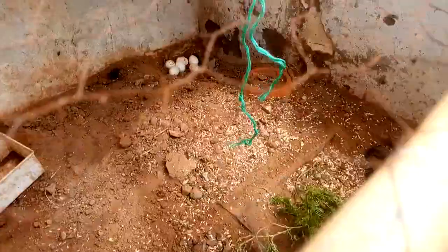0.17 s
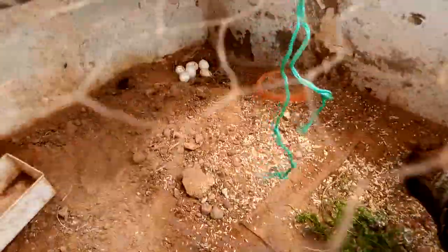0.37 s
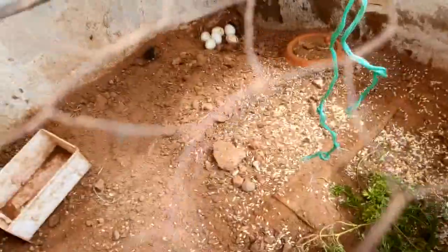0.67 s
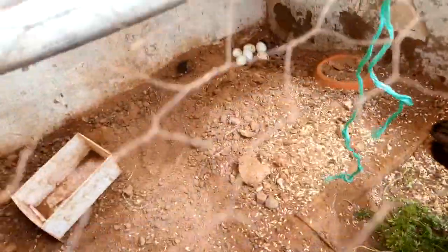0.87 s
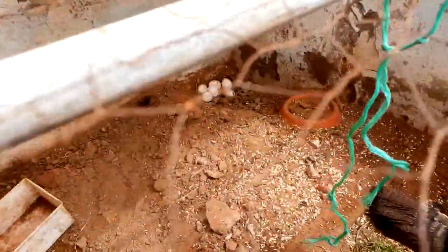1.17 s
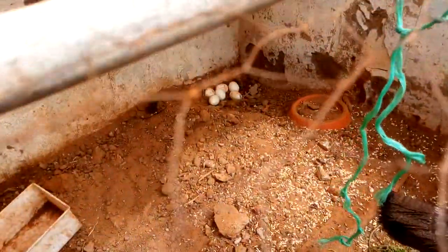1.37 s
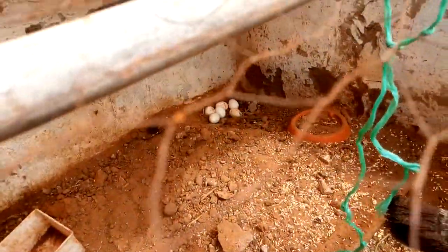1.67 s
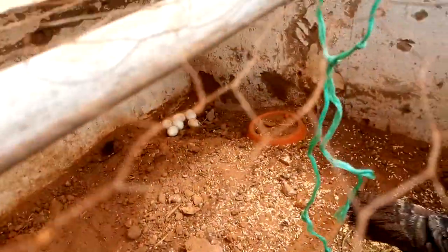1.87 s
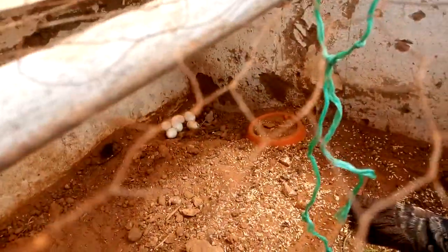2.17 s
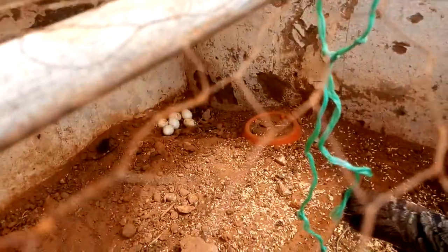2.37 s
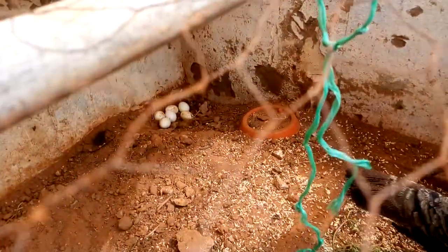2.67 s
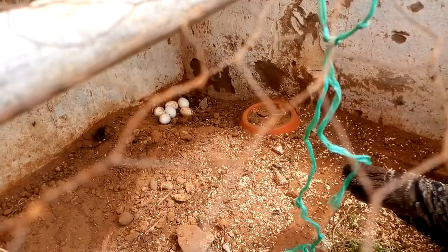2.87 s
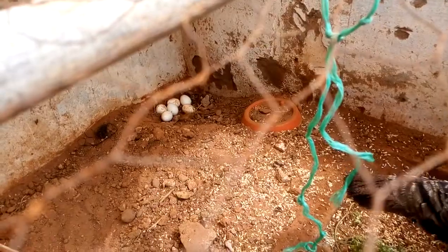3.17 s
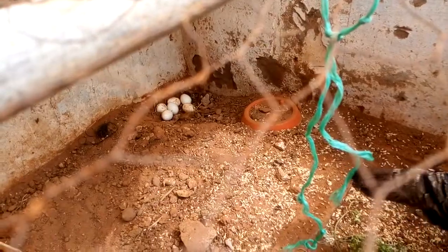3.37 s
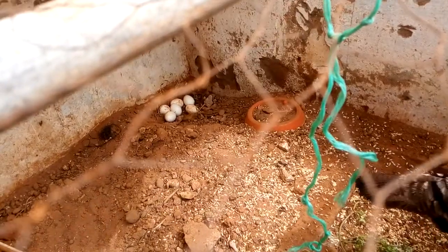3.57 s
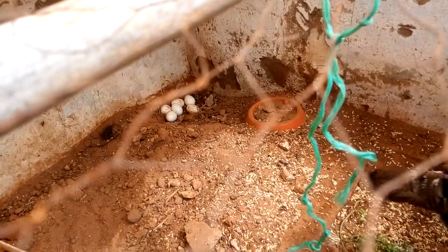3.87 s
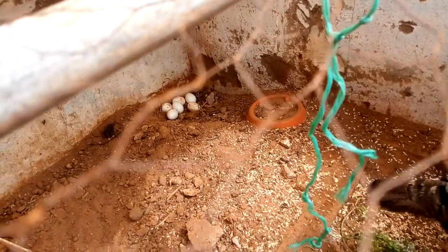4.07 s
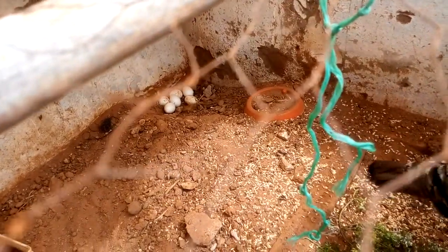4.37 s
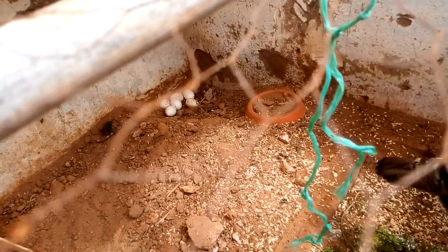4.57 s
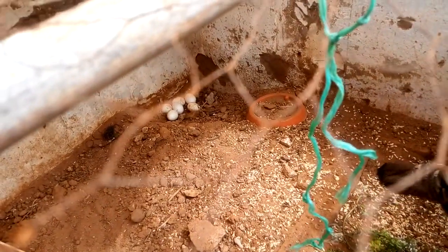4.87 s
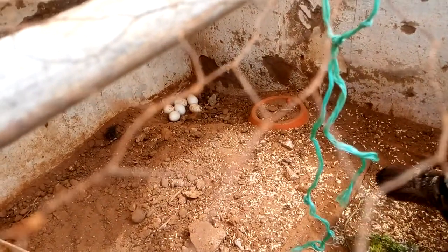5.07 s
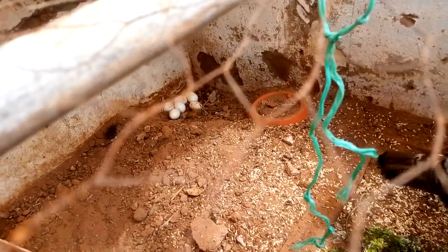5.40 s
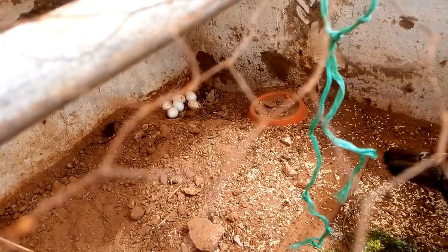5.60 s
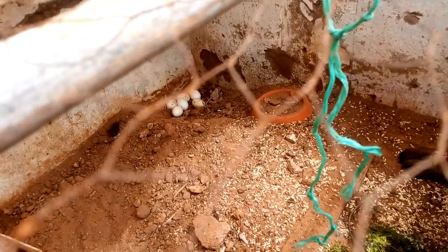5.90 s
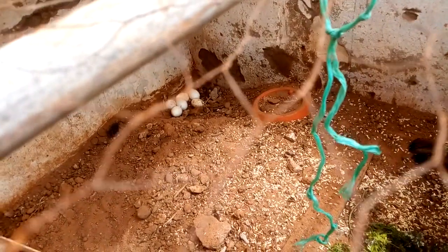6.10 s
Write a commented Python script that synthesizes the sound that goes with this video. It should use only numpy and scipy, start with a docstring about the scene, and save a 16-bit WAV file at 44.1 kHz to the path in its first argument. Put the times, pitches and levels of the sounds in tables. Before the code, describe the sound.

A quiet outdoor pen with hard walls, heard close by on a handheld phone: soft airy hush, slight hiss, a thin far-off bird whistle at the start. From 0.3 to 0.6 s feet crackle and scrape in dry grit, with sharp small ticks. At 0.77 s a turkey hen voices a short clear note, then four quick upward chirps until about 1.05. A soft feathery brush and scrape come at 1.1 to 1.3, then a thudding, crackling scuffle at 1.7 to 1.9. A twig snaps at 2.5; a second, higher, tightly packed call runs 2.7 to 2.9. A third, three chirps, comes at 3.65 to 3.9. Mostly hush follows, with tiny rustles near 4.25. A hollow knock sounds at 5.24, then five chirps from 5.5 to 5.8. Faint wire creaks, rustles and distant whistles close it, past 6 s. Near walls echo the calls briefly.

```python
"""Turkey hen in an earth pen

A turkey hen purrs a metre or two from a hand-held phone: held harmonic tones, then quick rising chirps.
Noise grains make feet scuff dry litter and feathers brush it; short cracks and decaying modes make twigs
and grit tick. The wire fence rings in its modes and creaks in wavering tones, and small birds whistle in
arched tones far off. Near walls throw back the voice and ticks, over a flickering hush of open air."""
import sys
import numpy as np
from scipy import signal
from scipy.fft import rfft, irfft
from scipy.io import wavfile
from scipy.ndimage import uniform_filter1d

SR = 44100
rng = np.random.default_rng(int(sys.argv[2]) if len(sys.argv) > 2 else 0)


def natural_amplitude(level_db):
    """Convert a level in decibels to a linear amplitude factor, elementwise."""
    exponent = np.asarray(level_db, float) / 20
    return 10 ** exponent


def pcm_store(signal):
    """Save signal as 16-bit PCM."""
    levels = np.round(np.clip(np.atleast_2d(signal), -1, 1) * 32767)
    wavfile.write(sys.argv[1], SR, levels.astype(np.int16).T)


N = 275184
T = np.arange(N) / SR


def unit(x):
    """Scale to rms 1."""
    return x / np.sqrt(np.mean(x ** 2))


def colour(x, points):
    """Shape a spectrum by (frequency [Hz], level [dB]) points, joined along log frequency."""
    hz, db = np.transpose(points)
    f = np.fft.rfftfreq(len(x), 1 / SR) + 1
    gain = natural_amplitude(np.interp(np.log(f), np.log(hz), db))
    return irfft(rfft(x) * gain, len(x))


def band(x, lo_hz, hi_hz):
    """Causal band-pass."""
    return signal.sosfilt(signal.butter(2, [lo_hz, hi_hz], "band", fs=SR, output="sos"), x)


def walk(rate):
    """Random levels held 1 / rate seconds and slewed; spread near 1."""
    k = int(SR / rate)
    held = np.repeat(rng.standard_normal(N // k + 1), k)
    return 1.03 * uniform_filter1d(held, k)[:N]


def add(out, s, sound):
    """Mix a sound in at time s."""
    i = int(s * SR)
    out[i:i + len(sound)] += sound[:N - i]


def ring(hz, t60):
    """One mode that decays by 60 dB in t60 seconds."""
    t = T[:int(t60 * SR)]
    return np.sin(2 * np.pi * hz * t) * np.exp(-np.log(1000) * t / t60)


def grit(rate, scatter_db, hiss):
    """Cracks of very uneven size, rate per second, each a brief noise burst, over some hiss."""
    crack_s = .0006  # decay time
    hit = rng.random(N) < rate / SR
    size = np.minimum(rng.exponential(size=N), 2.7)
    noise = rng.standard_normal(N)
    bursts = signal.lfilter([1], [1, -np.exp(-1 / (crack_s * SR))], hit * natural_amplitude(scatter_db * size))
    return unit(bursts * rng.standard_normal(N)) + hiss * noise


def patchy(x, points, patchy_db):
    """Colour a sound in overlapping thirds of an octave, each of which comes and goes on its own."""
    spectrum = rfft(colour(x, points))
    thirds = 3 * np.log2(np.fft.rfftfreq(N, 1 / SR) + 1)
    first, last = np.ceil(3 * np.log2([points[0][0], points[-1][0]]))
    out = 0
    for centre in np.arange(first, last):
        share = np.cos(np.pi / 2 * np.clip(thirds - centre, -1, 1)) ** 2
        out = out + natural_amplitude(patchy_db * walk(50)) * irfft(spectrum * share, N)
    return unit(out)


# the hen's held notes: (start [s], length [s], starting pitch [Hz], middle pitch [Hz], end pitch [Hz],
#                        level at the starting pitch [dB])
HELD_NOTES = [(.766, 0.079, 779, 750, 703, -33.5), (2.676, 0.052, 698, 702, 678, -43),
              (3.659, 0.034, 853, 833, 776, -38), (3.693, 0.02, 828, 857, 881, -40),
              (5.51, 0.042, 780, 776, 828, -40), (5.845, 0.013, 763, 790, 765, -41)]
# overtones of each held note, against its fundamental: (second harmonic [dB], third harmonic [dB])
HELD_OVERTONES = [(-15.5, -22), (-22, -23.5), (-12, -15.5), (-15, -28), (-30.5, -29), (-39, -45)]


def held_notes():
    """A clean tone with two weak harmonics; it swells in, bends in pitch, louder where higher, and stops."""
    attack_s, release_s = 0.013, 0.0038
    db_per_octave = 50  # more effort raises pitch and level together
    out, t = np.zeros(N), T[:SR // 8]
    for (s, length, *pitch_hz, db), (second_db, third_db) in zip(HELD_NOTES, HELD_OVERTONES):
        opening = np.interp(t, [0, attack_s, length, length + release_s], [0, 1, 1, 0])
        gate = np.sin(np.pi / 2 * opening) ** 2
        hz = uniform_filter1d(np.interp(t, [0, length / 2, length], pitch_hz), size=400)
        phase = 2 * np.pi * np.cumsum(hz) / SR
        tone = np.sin(phase) + natural_amplitude(second_db) * np.sin(2 * phase) + natural_amplitude(third_db) * np.sin(3 * phase)
        level = np.sqrt(2) * natural_amplitude(db + db_per_octave * np.log2(hz / pitch_hz[0]))
        add(out, s, gate * level * tone)
    return out


# the hen's chirps, one list per call: (time of the crest [s], crest level before smoothing [dB],
#                        pitch at the crest [Hz], steepest climb [Hz/ms], swell time [ms])
CHIRP_CALLS = [
    [(.848, -29, 880, 31.2, 6.4), (.915, -28.5, 892, 40.7, 5.8), (0.973, -28.5, 890, 51, 1.8),
     (1.029, -26.5, 880, 58.6, 3.1)],
    [(2.73, -32, 917, 12.5, 4.6), (2.784, -33, 654, 2.8, 5.5), (2.792, -24.5, 1007, 54, 2.5),
     (2.843, -31.5, 704, 16, 2.2), (2.85, -24, 1004, 63, 1.9), (2.908, -26.5, 1010, 55, 4)],
    [(3.776, -28.5, 878, 49, 4.2), (3.833, -26.5, 900, 43.7, 4.8), (3.889, -22.5, 900, 54, 3.2)],
    [(5.562, -30.5, 1002, 28.7, 6.8), (5.624, -29, 1063, 57.5, 8.6), (5.684, -27, 1037, 62, 5.3),
     (5.741, -25.5, 1020, 61, 4.2), (5.798, -25, 1000, 53, 3.3)],
]
# her throat in each call: (second harmonic [dB], third harmonic [dB], throat resonance [Hz],
#                        top of the sweep [Hz])
CHIRP_THROATS = [(-15.5, -29, 1785, 1330), (-10, -22, 1915, 1540), (-27, -46, 1750, 1420),
                 (-25, -34.5, 2090, 1470)]


def chirps():
    """Each chirp swells while it climbs, peaks, and runs on more softly towards the top of its sweep."""
    lead_s = .03  # room for the swell before the crest
    low_hz, throat_width_hz, upper_throat_hz = 638, 280, 2310
    crest_s, tail_s, tail_db = 0.00083, .0075, -6
    out, t = np.zeros(N), T[:int(.07 * SR)] - lead_s
    for call, (second_db, third_db, throat_hz, top_hz) in zip(CHIRP_CALLS, CHIRP_THROATS):
        middle, half = (top_hz + low_hz) / 2, (top_hz - low_hz) / 2
        for s, db, hz, climb, swell_ms in call:
            start = np.arctanh(np.clip((hz - middle) / half, -.99, .99))
            pitch = middle + half * np.tanh(start + climb * 1e3 * t / half)
            phase = 2 * np.pi * np.cumsum(pitch) / SR
            rise = np.exp(-np.abs(t * 1e3 / swell_ms) ** 1.26)
            crest = np.exp(-(t / crest_s) ** 2)
            tail = natural_amplitude(tail_db) * np.exp(-(t / tail_s) ** 4) * (1 - crest)
            env = np.where(t < 0, rise, crest + tail)
            env = uniform_filter1d(uniform_filter1d(env, size=60), size=45)
            # harmonics show near the crest, each best while it crosses a throat resonance
            near = np.exp(-(t / 0.0067) ** 2)
            lo_hz, hi_hz = throat_hz - throat_width_hz / 2, throat_hz + throat_width_hz / 2
            second = natural_amplitude(second_db) * band(near * np.sin(2 * phase), lo_hz, hi_hz)
            upper_throat = natural_amplitude(third_db) / (1 + ((3 * pitch - upper_throat_hz) / 250) ** 2)
            third = near * upper_throat * np.sin(3 * phase)
            add(out, s - lead_s, natural_amplitude(db) * (env * np.sin(phase) + second + third))
    return out


def hen():
    """Held notes and chirps, with a rasp of air that trails the voice."""
    rasp_hz, breath_db = (1340, 2550), -26
    voice = held_notes() + chirps()
    effort = uniform_filter1d(np.abs(voice), size=500, origin=200)  # origin delays it
    rasp = unit(band(band(rng.standard_normal(N), *rasp_hz), *rasp_hz))
    return voice + natural_amplitude(breath_db) * effort * rasp


# feet in the litter: (start [s], time to fade by 20 dB [s], crackle [dB], scrape [dB], thud [dB])
SCUFFS = [(0.29, 0.1112, -31, -33.5, -40.5), (0.334, 0.0946, -32.5, -55, -49),
          (0.366, 0.0385, -28, -59, -58), (0.38, 0.0857, -32, -39, -47.5), (0.441, 0.09, -31.5, -45, -48),
          (0.489, 0.027, -32, -31.5, -43.5), (.545, 0.0842, -45, -44.5, -53), (.568, 0.0239, -43, -49, -36),
          (0.6, 0.1271, -48.5, -44.5, -43.5), (1.166, 0.1, -37.5, -34.5, -49),
          (1.195, 0.163, -57, -46.5, -44.5), (1.595, 0.1457, -57, -57, -60), (1.716, 0.107, -40, -45, -46),
          (1.736, 0.0432, -34, -39.5, -36), (1.762, 0.0752, -32, -32.5, -31),
          (1.794, 0.0982, -38, -35.5, -38), (1.834, 0.09, -43.5, -46, -37.5),
          (1.905, 0.0562, -49.5, -49.5, -46.5), (1.975, 0.07, -53.5, -64, -61), (2.27, 0.24, -76, -72, -65),
          (4.255, 0.28, -59, -76, -69), (5.239, 0.12, -59, -58.5, -67.5), (5.861, 0.06, -55.5, -53, -53),
          (5.888, 0.1, -79, -57, -48), (6.082, 0.14, -73, -65.5, -55), (6.19, 0.76, -61, -59.5, -58.5)]
# spectra of crackling grit (also of ticks and far-off stirring), scraping feet and their thud, each:
# (frequency [Hz], relative level per Hz [dB])
CRACKLE_SPECTRUM = [(1500, -12), (2600, -13.5), (3200, -3.5), (4300, -11), (5900, 0.5), (7200, -10.5),
                    (8600, -27), (16200, -29.5)]
SCRAPE_SPECTRUM = [(300, -7.5), (550, -1.5), (1500, -1), (2900, -12)]
THUD_SPECTRUM = [(50, -9.5), (120, -1), (400, -5.5), (800, -15.5)]


def scuffs():
    """Grit crackles, feet scrape and thud; each scuff starts fast and dies away as the litter settles."""
    attack_share = 0.064  # of the fading time
    power = np.zeros((3, N))
    for s, fade, *db in SCUFFS:
        t = T[:int(3 * fade * SR)]
        attack = np.minimum(t / (attack_share * fade), 1) ** 2
        shape = attack * natural_amplitude(-2 * 20 * (t / fade) ** 1.06)
        for layer, layer_db in zip(power, db):
            add(layer, s, natural_amplitude(2 * layer_db) * shape)
    grains = grit(550, 3.6, .45) * natural_amplitude(2.0 * walk(120))
    crackle = patchy(grains, CRACKLE_SPECTRUM, 3.2)
    scrape = patchy(grains + grit(400, 3.9, 0.5), SCRAPE_SPECTRUM, 2.4)
    thud = patchy(grit(250, 1.2, 1.27), THUD_SPECTRUM, 4.7)
    return np.sum(np.sqrt(power) * [crackle, scrape, thud], axis=0)


# twigs and grit that tick: (time [s], crack level before colouring [dB], ring pitch [Hz], ring level [dB])
TICKS = [(0.293, -7, 410, -28), (0.3024, -22, 840, -41), (0.3408, -20.5, 2390, -25.5),
         (0.3597, -23.5, 2980, -29), (0.3805, -15.5, 1520, -24), (0.3903, -19, 403, -29),
         (0.4457, -18.5, 2940, -46), (0.5007, -39, 376, -29), (0.5091, -19.5, 1550, -22.5),
         (0.5467, -32, 2440, -31.5), (0.5672, -35.5, 710, -34.5), (0.5724, -50, 168, -31.5),
         (0.6055, -29, 1680, -29.5), (0.6913, -33.5, 870, -33), (0.7446, -68, 500, -43.5),
         (1.1668, -39.5, 684, -33), (1.1844, -20.5, 466, -26.5), (1.213, -50, 4750, -28),
         (1.611, -19, 1580, -33), (1.739, -24, 300, -35.5), (1.7659, -20.5, 1480, -26.5),
         (1.7758, -30, 400, -34), (1.7822, -22.5, 199, -38), (1.7934, -29, 1560, -24),
         (1.8213, -21.5, 272, -41), (1.8338, -34, 250, -34.5), (1.852, -28, 395, -30.5),
         (1.843, -28.5, 1500, -47),  (2.16, -43.5, 1640, -52.5), (2.4917, -43, 1070, -42),
         (4.2573, -45.5, 5450, -56), (4.6027, -43.5, 500, -76), (6.1613, -41.5, 2300, -54.5)]


def ticks():
    """A noisy crack of a millisecond or two and a short dull ring, longer where lower."""
    cracks, rings = np.zeros(N), np.zeros(N)
    t = T[:int(.01 * SR)]
    for s, db, hz, ring_db in TICKS:
        noise = rng.standard_normal(len(t))
        add(cracks, s, natural_amplitude(db) * noise * np.exp(-t / 0.00097))
        add(rings, s, natural_amplitude(ring_db) * ring(hz, 0.0075 + 5 / hz))
    # contact is not instant, so the rings start rounded
    return colour(cracks, CRACKLE_SPECTRUM) + uniform_filter1d(rings, size=7)


# a hollow knock and its bounce: (time [s], level [dB])
KNOCKS = [(5.242, -24.5), (5.291, -49)]
# modes of the knocked thing: (frequency [Hz], relative level [dB], time to decay by 60 dB [s])
KNOCK_MODES = [(517, -16, 0.06), (598, -12, 0.052), (2003, -15, 0.044), (2196, -11, 0.041),
               (3070, -14, 0.039), (3490, -21, 0.057), (4580, -16, 0.04), (5260, -12.5, 0.038)]


def knocks():
    """A hollow knock rings in its own modes, which build up over the contact and die away."""
    contact_s = 0.0043
    rings = np.zeros(N)
    for s, db in KNOCKS:
        for hz, mode_db, t60 in KNOCK_MODES:
            mode = ring(hz, t60)
            onset = np.minimum(T[:len(mode)] / contact_s, 1) ** 2
            add(rings, s, natural_amplitude(db + mode_db) * mode * onset)
    return uniform_filter1d(rings, size=7)


# a twig that snaps: (time [s], level before colouring [dB])
SNAPS = [(2.4922, -7)]
# its bright, even spectrum: (frequency [Hz], relative level [dB])
SNAP_SPECTRUM = [(1200, -51.5), (2200, 0), (6300, -0.5), (7500, -27), (12000, -48), (16000, -43)]


def snaps():
    """One sharp break, trailed by a millisecond of splintering."""
    out, t = np.zeros(N), T[:int(.01 * SR)]
    for s, db in SNAPS:
        splinters = .1 * rng.standard_normal(len(t)) * np.exp(-t / .001)
        add(out, s, natural_amplitude(db) * ((t == 0) + splinters))
    return colour(out, SNAP_SPECTRUM)


# soft brushes of feathers and chaff, levels before shaping and wavering:
# (start [s], length [s], low swish [dB], mid swish [dB], high swish [dB])
BRUSHES = [(0.653, 0.064, -60, -55.5, -52), (1.113, .11, -43.5, -45.5, -60.5),
           (1.373, 0.13, -72.5, -79, -70), (1.698, 0.051, -59, -63, -51), (1.988, 0.21, -75, -70.5, -77.5),
           (4.245, 0.15, -77.5, -63.5, -60.5), (4.96, 0.072, -70.5, -69, -74),
           (5.923, 0.3, -69.5, -73, -80.5)]
# bands of the low, mid and high swish: (lower edge [Hz], upper edge [Hz])
BRUSH_BANDS = [(350, 1160), (1200, 2310), (4600, 6450)]


def brushes():
    """Finely grained swishes that set in quickly, hold, and trail off; each band wavers alone."""
    attack_s, release_s = 0.01, 0.059
    env = np.zeros((3, N))
    for s, length, *db in BRUSHES:
        corners_s = [0, attack_s, length, length + release_s]
        shape = np.interp(T[:SR // 2], corners_s, [0.15, 0.97, 0.8, 0.017]) ** 2
        for layer, layer_db in zip(env, db):
            add(layer, s, natural_amplitude(layer_db) * shape)
    out = np.zeros(N)
    for layer, hz in zip(env, BRUSH_BANDS):
        swish = unit(band(band(grit(500, 3.3, 0.97), *hz), *hz))
        out += layer * natural_amplitude(2.0 * walk(40)) * swish
    return out


# wire mesh shaken by the scuffs and brushes: (frequency [Hz], level [dB], time to decay by 60 dB [s])
MESH_MODES = [(518, -31.5, 0.36), (783, -29.5, 0.3), (1372, -27.5, 0.24), (2990, -29, 0.22),
              (5840, -29, 0.23)]


def mesh(x):
    """The fence rings on faintly after each shake, in decaying modes."""
    response = np.zeros(SR // 2)
    for hz, db, t60 in MESH_MODES:
        mode = ring(hz, t60)
        add(response, 0, natural_amplitude(db) * mode / np.sqrt(np.sum(mode ** 2)))
    return x + signal.fftconvolve(x, response)[:N]


# wire that creaks faintly, levels before fluttering:
# (start [s], length [s], pitch [Hz], fundamental [dB], each overtone [dB])
CREAKS = [(5.866, .024, 1440, -69, -57), (5.93, .19, 1390, -69, -92), (6.15, .066, 517, -58.5, -83)]


def creaks():
    """Unsteady tones of rubbed wire with three overtones; they swell and fade."""
    out = np.zeros(N)
    waver = 1 + .012 * walk(150)
    flutter = natural_amplitude(3 * walk(150))
    for s, length, hz, db, upper_db in CREAKS:
        i, n = int(s * SR), int(length * SR)
        phase = 2 * np.pi * hz * np.cumsum(waver[i:i + n]) / SR
        overtones = sum(np.sin(k * phase) for k in range(2, 5))
        tone = natural_amplitude(db) * np.sin(phase) + natural_amplitude(upper_db) * overtones
        add(out, s, np.sqrt(np.hanning(n)) * flutter[i:i + n] * tone)
    return out


# how the nearest wall answers as the hen moves: (from [s], echo delay [ms], echo level before filtering [dB])
PLACES = [(0, 5.24, -2), (2, 5.6, -4), (3.3, 6, -6), (5.4, 6.8, -4)]


def pen(x):
    """Walls return a clear echo that shifts by place, a faint later one, and a short dull tail."""
    late_s, late_db = .0135, -17
    echo_low_hz, echo_top_hz = 802, 1370  # echoes are strongest around the pitch of the chirps
    tail_t60_s, tail_db, tail_top_hz = 0.25, -23.5, 4060
    t = T[:int(tail_t60_s * SR)]
    noise = band(rng.standard_normal(len(t)), 150, tail_top_hz)
    tail = noise * np.exp(-np.log(1000) * t / tail_t60_s) * (t > .012)
    tail = natural_amplitude(tail_db) * tail / np.sqrt(np.sum(tail ** 2))
    echoes = np.zeros(N)
    place = np.searchsorted(np.array(PLACES)[:, 0], T, side="right") - 1
    for k, (_, delay_ms, db) in enumerate(PLACES):
        add(echoes, delay_ms / 1e3, natural_amplitude(db) * x * (place == k))
    add(echoes, late_s, natural_amplitude(late_db) * x)
    return x + band(echoes, echo_low_hz, echo_top_hz) + signal.fftconvolve(x, tail)[:N]


# small birds far off, each an arch of pitch, levels before fluttering:
# (start [s], length [s], pitch at the ends [Hz], pitch at the top [Hz], level [dB])
WHISTLES = [(0, 0.156, 5220, 5326, -59.5), (2.949, 0.03, 3400, 3550, -64.5), (3.377, .25, 4070, 4470, -73),
            (5.688, 0.099, 5025, 5470, -72), (6.007, 0.15, 5130, 5480, -70.5),
            (6.219, 0.037, 3170, 3410, -61.5)]


def whistles():
    """Thin wavering tones, smeared and doubled by distance."""
    echo_s, echo_db = 0.026, -5.5
    out, waver = np.zeros(N), 1 + .006 * walk(80)
    for s, length, end_hz, top_hz, db in WHISTLES:
        i = int(s * SR)
        arch = np.sin(np.pi * T[:int(length * SR)] / length)[:N - i]
        hz = (end_hz + (top_hz - end_hz) * arch) * waver[i:][:len(arch)]
        tone = np.sin(2 * np.pi * np.cumsum(hz) / SR)
        add(out, s, natural_amplitude(db) * np.minimum(arch / 0.3, 1) * tone)
    # many paths of unlike length make the tone flutter
    out = out * (1 + 0.8 * unit(uniform_filter1d(rng.standard_normal(N), size=400)))
    add(out, echo_s, natural_amplitude(echo_db) * out)
    return out


# spectrum of open air and microphone hiss: (frequency [Hz], relative level per Hz [dB])
AIR_SPECTRUM = [(34, -0.5), (56, 5), (180, -5.5), (400, -8.5), (900, -12.5), (3000, -17.5), (5600, -17.5),
                (7000, -23.5), (8300, -28), (20000, -29)]


def air():
    """Open-air hush and microphone hiss, flickering band by band, with ticks of faint far-off stirring."""
    air_db, stirring_db = -67, -21.0  # the stirring is relative to the hush
    hush = patchy(rng.standard_normal(N), AIR_SPECTRUM, 3.5)
    stirring = patchy(grit(28, 5.7, 0.5), CRACKLE_SPECTRUM, 2.2)
    return natural_amplitude(air_db) * (hush + natural_amplitude(stirring_db) * stirring)


def scene():
    """The hen stands among the walls; the litter lies nearer, so less of it comes back."""
    litter = ticks() + knocks() + snaps()
    # the -6 dB share of the litter also passes straight through pen()
    walled = pen(hen() + natural_amplitude(-6) * litter)
    dry = walled + litter + mesh(scuffs() + brushes()) + creaks() + whistles() + air()
    return dry[None]


def low_pass(x):
    """Removes everything above the highest recorded frequency."""
    return signal.sosfilt(signal.butter(12, 16380, fs=SR, output="sos"), x)


def record(dry):
    """The hand-held phone cuts the deepest bass, below 45 Hz."""
    bass_cut = signal.butter(2, 45, "high", fs=SR, output="sos")
    mix = signal.sosfilt(bass_cut, dry)
    return low_pass(mix)


dry = scene()
out = record(dry)
pcm_store(out)
```